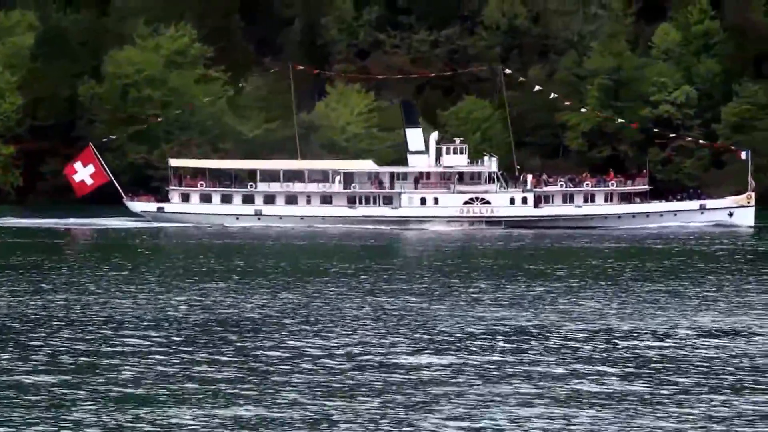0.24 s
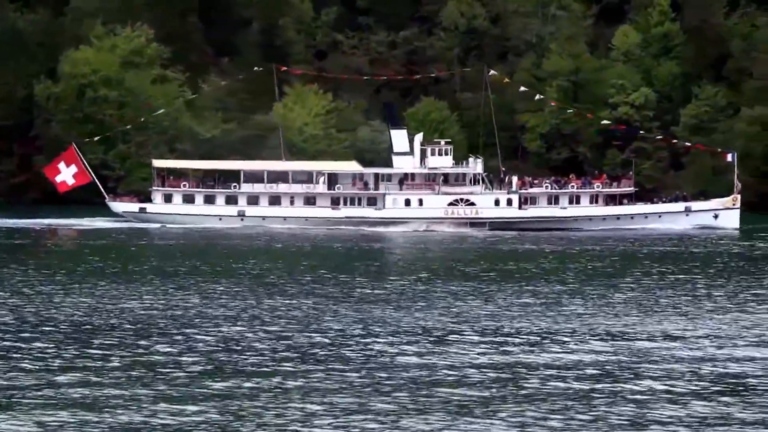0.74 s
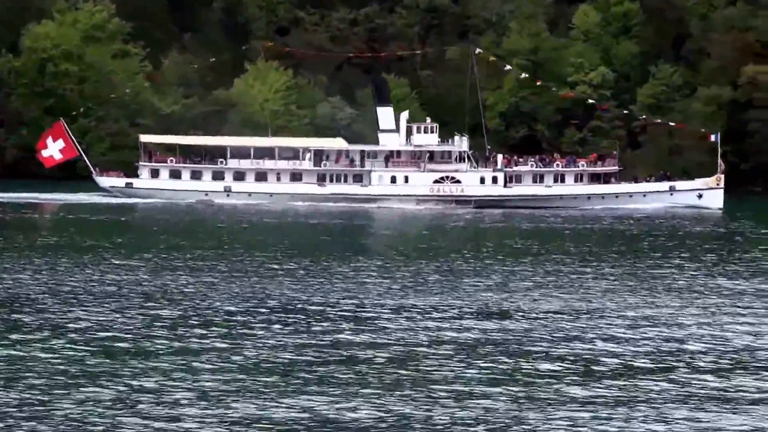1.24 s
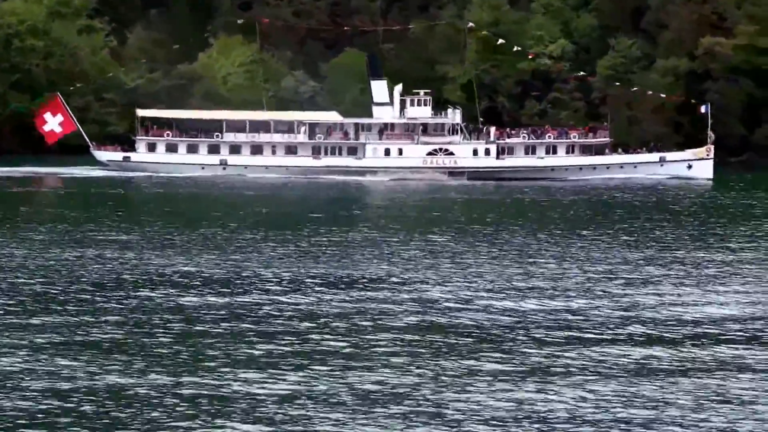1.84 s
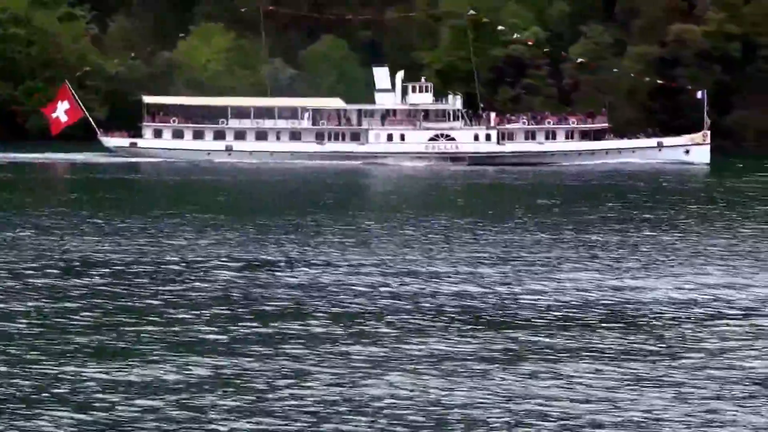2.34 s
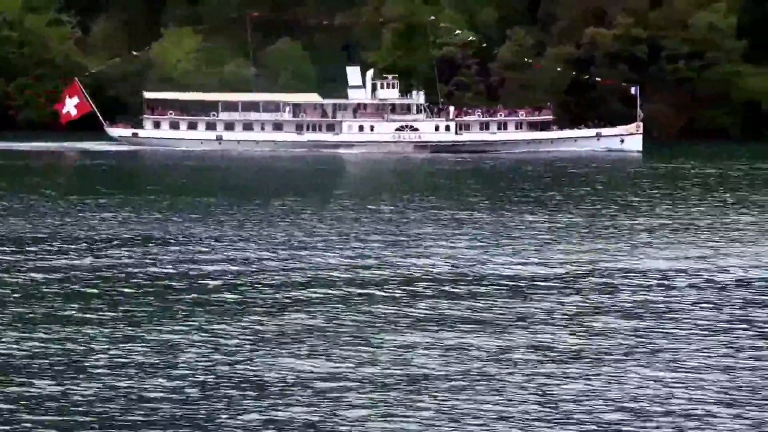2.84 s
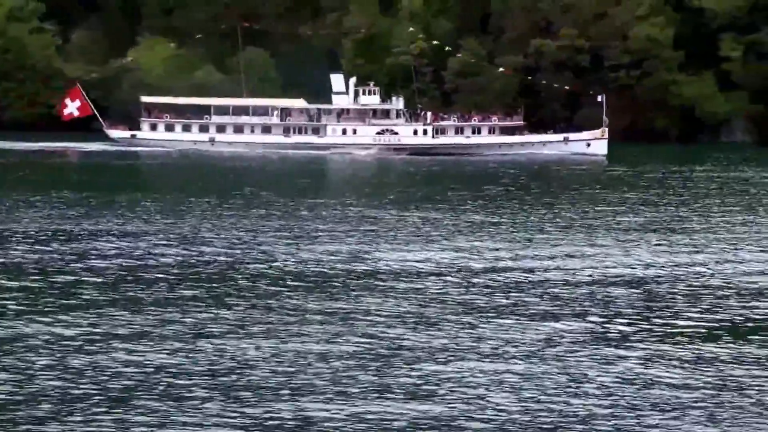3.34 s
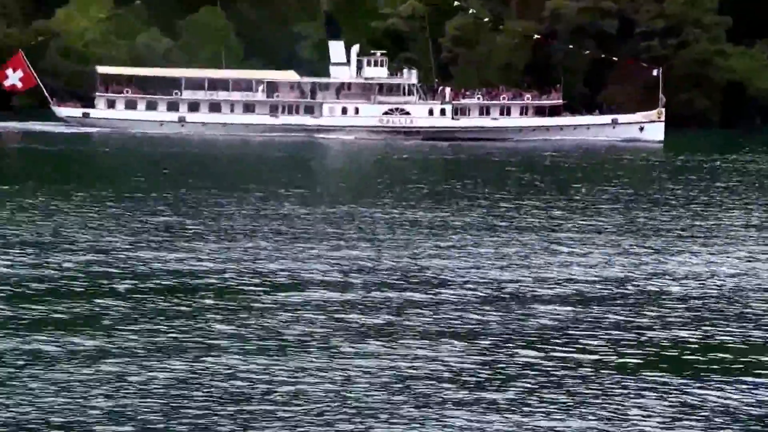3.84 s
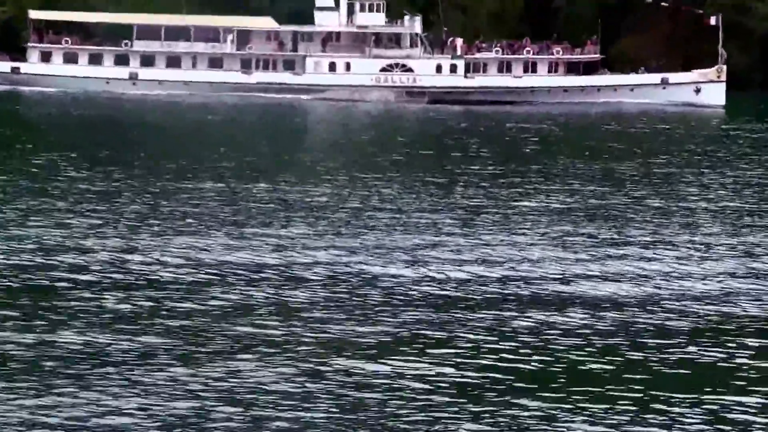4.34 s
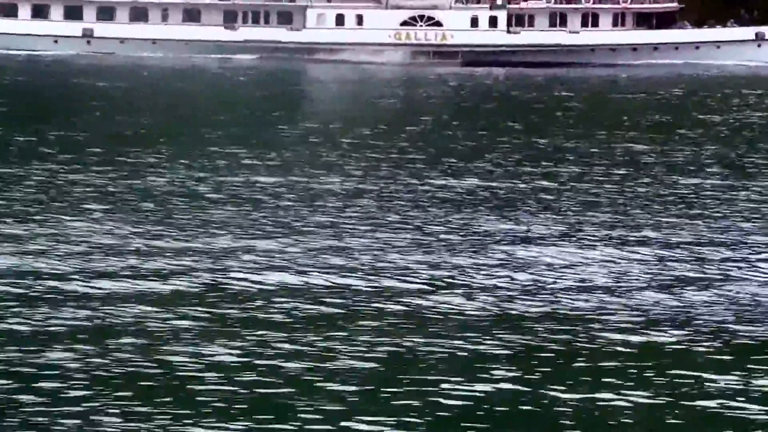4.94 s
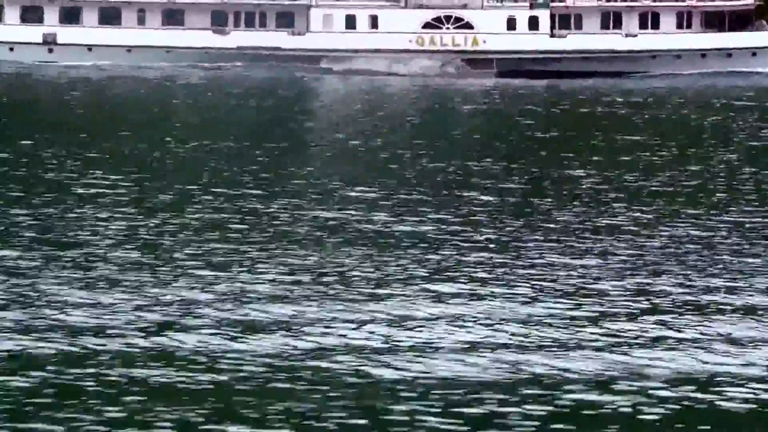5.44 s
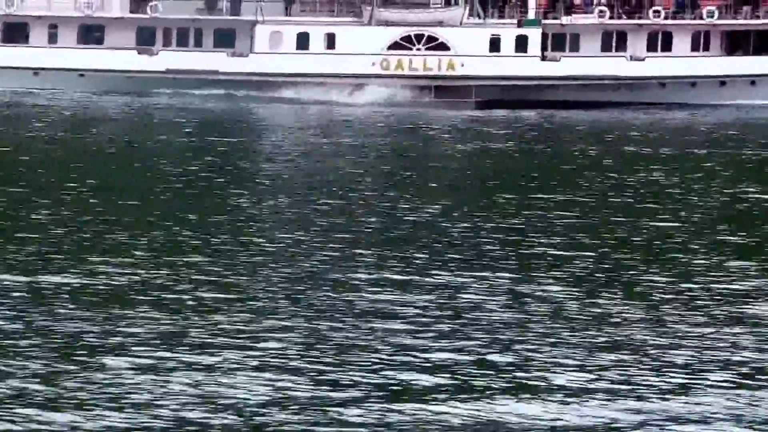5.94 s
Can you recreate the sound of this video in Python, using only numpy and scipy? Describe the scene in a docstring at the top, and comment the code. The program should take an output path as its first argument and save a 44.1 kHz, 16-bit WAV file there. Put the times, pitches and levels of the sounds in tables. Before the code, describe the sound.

Steady, low-mid roar of churned water from a passing paddle wheel, bubbling and gulping, sprinkled with small wet claps and fine droplets.

```python
"""A paddle steamer passes on a lake, heard across the water from the shore.
Its floats slap in a quick even beat and beat air into the water: dense gulps of resonant air pockets blend
into a somewhat louder wash of noise, a dull steady rush. The thrown spray falls back as a dense crackle of
filtered clicks and ringing bubbles, with sharper claps made of a snap and a damped ring.
Below lies a low pounding of noise, above it a thin hiss with brief swells and tiny ticks."""
import sys
import numpy as np
from scipy import signal
from scipy.fft import rfft, irfft
from scipy.io import wavfile

SR = 44100
rng = np.random.default_rng(int(sys.argv[2]) if len(sys.argv) > 2 else 0)


def put_to_file(sound):
    """Save the sound as 16-bit audio at rate SR, in the file named by the first command-line argument."""
    columns = np.atleast_2d(sound).T  # one column per channel
    safe = np.clip(columns, -1, 1)
    whole_steps = np.round(safe * 32767)
    wavfile.write(sys.argv[1], SR, whole_steps.astype(np.int16))


N = 272979

FLOAT_HZ, FIRST_SLAP_S = 4.62, .065   # mean strike rate; nominal time of the first slap


def float_beat(wander):
    """Periodic forcing: a cosine between -1 and 1 peaks at each float strike, its phase drifting by wander turns."""
    turns = FLOAT_HZ * (np.arange(N) / SR - FIRST_SLAP_S) + wander * drift(0.73)
    return np.cos(2 * np.pi * turns)


# Spectrum of the wash behind the wheel. Each row: frequency in Hz, relative density in dB per Hz.
WASH_SPECTRUM = [(100, -29), (220, -3), (380, 1.5), (750, -9.5), (1200, -20), (2000, -38.5), (4000, -63.5),
                 (12000, -95)]


def churn(churn_db, beat, gulp_db, wash_db, beat_db):
    """Superposition of bubble sources: dense gulps blend into the somewhat louder blurred wash of the wake."""
    pockets = widen(gulps(per_s=2200, spread_db=0.7, damping=0.12))
    water = from_db(gulp_db) * pockets + from_db(wash_db) * rush(WASH_SPECTRUM)
    return from_db(churn_db + beat_db * beat) * water


# Spectrum that weights the air pockets. Each row: frequency in Hz, relative gain in dB.
GULP_SPECTRUM = [(90, -28.5), (140, -11.5), (210, 3.5), (370, 6), (560, 2.5), (850, -4), (1300, -39.5)]


def gulps(per_s, spread_db, damping, count=22):
    """Damped bubble resonance: trapped air pockets of many sizes ring for a few cycles each."""
    return colour(sum(ringing(per_s, spread_db, damping, np.geomspace(110, 1200, count))), GULP_SPECTRUM)


# Spectrum of the low pounding. Each row: frequency in Hz, relative density in dB per Hz.
RUMBLE_SPECTRUM = [(20, -49), (40, -32.5), (60, -22), (80, -10), (100, -6), (160, 2), (220, 1),
                   (400, -19.5), (2000, -79.5)]


def rumble(level_db, beat, beat_db):
    """Cavity collapse: the largest cavities, left where a float dips in, collapse with a low pounding."""
    return from_db(level_db + beat_db * beat) * rush(RUMBLE_SPECTRUM)


# Spectrum of the falling drops. Each row: frequency in Hz, relative gain in dB.
SPRAY_SPECTRUM = [(80, -35), (250, -18), (600, 15), (1100, 9), (2000, -7), (3300, -23.5), (4100, -38),
                  (6300, -41.5), (8300, -60.5), (11000, -53.5), (13000, -75.5)]
# Spectrum of the finest drops. Each row: frequency in Hz, relative gain in dB.
FIZZ_SPECTRUM = [(1500, -14), (3300, 4), (4200, 1), (5000, -1), (6600, -7), (8000, -14), (11000, -15),
                 (12500, -30)]


def spray(spray_db, fizz_db, beat, beat_db, clump_db, bubble_db):
    """Random impacts: thrown water lands in clumps of tiny smacks that pinch off bubbles; the finest drops fizz."""
    smacks = rms_one(grains(per_s=3600, spread_db=5.0))
    mist = rms_one(grains(per_s=3500, spread_db=4.5))
    drops = from_db(spray_db + 8.0) * widen(colour(smacks, SPRAY_SPECTRUM))
    bubbles = from_db(spray_db + bubble_db) * widen(plips(per_s=1000, spread_db=2.5, damping=0.16))
    fine = from_db(fizz_db) * widen(colour(smacks + mist, FIZZ_SPECTRUM))
    landing = from_db(beat_db * beat + clump_db * drift(46))
    return landing * (drops + bubbles + fine)


BUBBLE_CUT_HZ = 3600   # low-pass on spray bubbles and clap pockets


def plips(per_s, spread_db, damping, count=12):
    """Bubble resonance: bubbles pinched off by spray ring briefly, the smallest faintest; distance softens onsets."""
    pitches = np.geomspace(1100, 3400, count)
    rings = ringing(per_s, spread_db, damping, pitches)
    weighted = sum(ring * (pitches[0] / hz) ** 2.4 for ring, hz in zip(rings, pitches))
    return rms_one(lowpass(weighted, 4, BUBBLE_CUT_HZ))


CLAP_LEFT_DB, CLAP_SCATTER_DB = 2, 2   # where the claps land, left minus right: mean and spread
# Sheets of water that clap down and trap a pocket of air. Each row: start in seconds, pocket resonance in Hz,
# ring level in dB, snap level in dB, both levels before the offsets shared by all claps.
CLAPS_HEARD = [(0.0824, 3600, -53, -56), (0.099, 2900, -39, -52), (0.1164, 2300, -38, -54),
               (0.1241, 2800, -43, -61), (0.2517, 3300, -50, -50), (0.4307, 2600, -39, -56),
               (0.947, 2100, -41, -50.5), (1.0212, 2800, -47, -64), (1.122, 2400, -45, -57),
               (1.2207, 2620, -46, -59), (1.248, 3500, -44, -48), (1.3607, 1950, -30.5, -62),
               (1.4064, 1750, -35, -56), (1.437, 2900, -37, -50), (1.47, 3000, -39.5, -58),
               (1.484, 2900, -44, -64), (1.543, 2000, -38, -50), (1.547, 3400, -47, -55),
               (1.5497, 3200, -47, -57), (1.589, 3100, -45, -61), (1.7697, 2100, -37, -62),
               (1.811, 1800, -30, -53), (1.917, 2100, -41, -50), (2.039, 3220, -45, -60),
               (2.164, 2500, -42, -57), (2.204, 3200, -40, -49), (2.2358, 2410, -40, -53),
               (2.32, 2330, -39, -59), (2.395, 2000, -32.5, -60), (2.409, 2930, -41, -65),
               (2.4131, 3000, -51, -63), (2.4747, 2700, -44, -62), (2.482, 2000, -36, -57),
               (2.4865, 3400, -48, -49), (2.5704, 3000, -44, -57), (2.5974, 3050, -38.5, -55),
               (2.6212, 2400, -42, -60), (2.6619, 2800, -49, -62), (2.7011, 2300, -42, -62),
               (2.807, 3400, -52, -58.5), (2.8458, 2700, -43.5, -64), (2.8511, 2950, -48, -63),
               (2.8673, 2100, -39, -59), (3.082, 2400, -41, -61), (3.1098, 2400, -40, -61),
               (3.1646, 2800, -54, -61), (3.2675, 2450, -41, -64), (3.3273, 2700, -42, -65),
               (3.3324, 3100, -49, -58), (3.508, 2900, -51, -61), (3.737, 2270, -40.5, -64),
               (3.93, 2050, -39, -63), (3.944, 2000, -33.5, -51), (4.0202, 3000, -52, -55),
               (4.2554, 3200, -53, -53), (4.3445, 2300, -40, -61), (4.481, 2200, -36.5, -56),
               (4.5623, 3000, -47, -54), (4.604, 2400, -41.5, -60), (4.733, 1980, -38, -61),
               (4.7956, 2450, -38.5, -54.5), (4.942, 2400, -43, -56), (5.0223, 2800, -45, -62),
               (5.0525, 1820, -37, -61), (5.114, 2260, -40.5, -56), (5.3149, 2400, -45, -59),
               (5.622, 2500, -43, -61), (5.628, 2400, -42.5, -62), (5.6648, 2250, -39, -52),
               (5.702, 1800, -37, -61), (5.7139, 1850, -38, -62), (5.774, 3200, -44, -52),
               (5.777, 2500, -35, -46), (6.0644, 2150, -37.5, -53), (6.1427, 1750, -32, -51),
               (6.1512, 3420, -57, -56)]
# Spectrum of the snap. Each row: frequency in Hz, relative gain in dB.
SNAP_SPECTRUM = [(1500, -2), (2700, 0), (3500, 0), (4300, -6), (5200, -10), (6500, -18), (8500, -24),
                 (11000, -27), (13000, -42)]


def claps(ring_db, snap_db, patter_s, snap_s):
    """Impulse excitation: each clap is a short snap with the heavily damped ring of its trapped air pocket."""
    out = np.zeros((2, N))
    for s, pocket_hz, low_db, high_db in np.vstack([CLAPS_HEARD, spatter()]):
        pocket = resonate(smack(patter_s), pocket_hz, width_hz=pocket_hz)
        pocket = lowpass(pocket, 4, pocket_hz)   # the ring dies off above its own pitch
        pocket = lowpass(pocket, 8, BUBBLE_CUT_HZ)
        snap = colour(smack(snap_s), SNAP_SPECTRUM, size=512)[:len(pocket)]
        sound = from_db(low_db + ring_db) * burst_one(pocket) + from_db(high_db + snap_db) * burst_one(snap)
        start = round(s * SR)
        left_db = CLAP_LEFT_DB + CLAP_SCATTER_DB * rng.standard_normal()
        out[:, start:start + len(sound)] += pan(sound, left_db)[:, :N - start]
    return out


# lesser claps: levels before the shared clap offsets
SPATTER_RING_DB, SPATTER_SNAP_DB, SPATTER_SPREAD_DB, SPATTER_FADE_DB_PER_S = -37.5, -57, 3, 1.5
SPATTER_LOW_HZ, SPATTER_OCTAVES, SPATTER_FALL_DB_PER_OCTAVE = 1700, 1.2, 12
SPATTER_RUN_S = 0.028   # the pieces of a torn sheet of water land within this time


def spatter(count=30, size=3):
    """Random arrivals: lesser claps come in short runs, small pockets ringing fainter; rows as in CLAPS_HEARD."""
    throws = np.repeat(rng.random(count), size) * (N / SR - 2 * SPATTER_RUN_S)
    delay, smallness, luck = rng.random((count * size, 3)).T
    s = throws + delay * SPATTER_RUN_S
    octaves = smallness * SPATTER_OCTAVES
    level_db = SPATTER_SPREAD_DB * (2 * luck - 1) - SPATTER_FADE_DB_PER_S * s
    ring_db = SPATTER_RING_DB - SPATTER_FALL_DB_PER_OCTAVE * octaves
    pocket_hz = SPATTER_LOW_HZ * 2 ** octaves
    return np.column_stack([s, pocket_hz, ring_db + level_db, SPATTER_SNAP_DB + level_db])


def smack(patter_s, size=512):
    """Impact noise: water hits water in a patter that decays exponentially at once."""
    return rng.standard_normal(size) * np.exp(-np.arange(size) / SR / patter_s)


HISS_CUT_HZ = 11600   # low-pass on ticks and swells
# Faint high ticks close by. Each row: time in seconds, peak level in dB before a shared offset.
TICKS_HEARD = [(1.1238, -63), (2.9064, -62), (2.9805, -68), (3.0012, -52), (3.0945, -47), (3.4374, -64),
               (3.4404, -62)]
# Spectrum of the thin hiss. Each row: frequency in Hz, relative density in dB per Hz.
HISS_SPECTRUM = [(3000, -22), (6500, -8), (9000, -8), (10200, -1), (11200, 0), (12200, -20), (14000, -36)]


def high_hiss(hiss_db, tick_db, tick_s):
    """Filtered noise: a thin hiss far above the rush, with a few tiny ticks of the same colour."""
    level = np.zeros(N)
    for s, peak_db in TICKS_HEARD:
        age = np.arange(N) / SR - s
        level += from_db(peak_db + tick_db) * (age >= 0) * np.exp(-np.abs(age) / tick_s)
    ticks = lowpass(level * rush(HISS_SPECTRUM) + 1e-18, 12, HISS_CUT_HZ)
    return from_db(hiss_db) * rush(HISS_SPECTRUM) + ticks


# Brief swells of the high hiss. Each row: centre in seconds, peak level in dB before the low-pass,
# half-length in seconds (to 1/e), centre frequency in Hz, width of each of two resonances in Hz.
SWELLS_HEARD = [(0.231, -65.5, 0.027, 10600, 1300), (.57, -66, 0.041, 10700, 1910),
                (.57, -72, .035, 8200, 1500), (0.733, -69, 0.044, 10700, 1700), (.73, -75, .05, 7800, 504),
                (2.016, -71, .05, 6300, 1290), (2.03, -72.5, .07, 10700, 1500)]


def swells():
    """Amplitude modulation: narrow bands of hiss rise and fall smoothly, each around one moment."""
    out = np.zeros(N)
    for s, peak_db, half_s, hz, width_hz in SWELLS_HEARD:
        band = resonate(resonate(rng.standard_normal(N), hz, width_hz), hz, width_hz)
        envelope = np.exp(-((np.arange(N) / SR - s) / half_s) ** 2)
        out += from_db(peak_db) * envelope * rms_one(band)
    return lowpass(out, 8, HISS_CUT_HZ)


def rush(spectrum):
    """Central limit: water sounds so many that they blur into a smooth stereo noise."""
    return widen(colour(rng.standard_normal((2, N)), spectrum))


def grains(per_s, spread_db):
    """Poisson-like arrivals: random clicks, many small and few large, each from its own direction: (mid, side)."""
    sizes = from_db(spread_db * np.minimum(rng.exponential(1, N), 5))
    clicks = (rng.random(N) < per_s / SR) * sizes * rng.choice([-1, 1], N)
    return np.array([clicks, clicks * rng.uniform(-1, 1, N)])


def ringing(per_s, spread_db, damping, pitches):
    """Resonator bank: each random click excites one pitch; damping is bandwidth over pitch."""
    births = grains(per_s, spread_db)
    dealt = rng.integers(0, len(pitches), N)
    return (resonate(births * (dealt == k), hz, damping * hz) for k, hz in enumerate(pitches))


def resonate(x, hz, width_hz):
    """Second-order resonance: one peak with gain 1 at its top."""
    r = np.exp(-np.pi * width_hz / SR)
    feedback = [1, -2 * r * np.cos(2 * np.pi * hz / SR), r * r]
    return signal.lfilter(np.array([1, 0, -1]) * (1 - r * r) / 2, feedback, x + 1e-18)


def lowpass(x, order, hz):
    """Butterworth filtering: a smooth pass band falls off above hz."""
    return signal.sosfilt(signal.butter(order, hz, fs=SR, output="sos"), x)


def colour(x, spectrum, size=4096):
    """Minimum phase: folding the cepstrum gives a causal filter with the given spectrum."""
    cepstrum = irfft(np.log(from_db(at_hz(spectrum, np.arange(size // 2 + 1) * SR / size))))
    cepstrum[1:size // 2] *= 2
    cepstrum[size // 2 + 1:] = 0
    impulse = irfft(np.exp(rfft(cepstrum)))
    return np.apply_along_axis(signal.fftconvolve, -1, x, impulse)[..., :N]


# Stereo width of the rush. Each row: frequency in Hz, side over mid in dB.
STEREO_WIDTH = [(25, -13), (60, -21), (140, -12.5), (300, -8.5), (550, -5), (1000, -2.5), (2000, -4),
                (4000, -8), (10000, -10.5)]


def widen(sound):
    """Sum and difference: mid and side become left and right, widest in the middle of the range."""
    mid, side = sound
    return rms_one(mid) + colour(rms_one(side), STEREO_WIDTH) * np.array([[1], [-1]])


def pan(x, left_db):
    """Level difference: place a sound between left and right."""
    return x * from_db(np.array([[.5], [-.5]]) * left_db)


def drift(rate):
    """Low-passed noise: a smooth random curve of spread 1 that turns about rate times a second."""
    r = np.exp(-80 * np.pi * rate / SR)   # computed at every 40th sample
    slow = signal.lfilter([1], [1, -2 * r, r * r], rng.standard_normal(N // 40 + 2002))[2000:]
    return np.interp(np.arange(N) / 40, np.arange(len(slow)), rms_one(slow))


def fading(start_db, db_per_s):
    """Exponential decay: a level in dB that sinks steadily as the ship draws on."""
    return start_db - db_per_s * np.arange(N) / SR


def in_time(rows):
    """Linear interpolation: the columns of a curve table at every sample."""
    s, *columns = np.transpose(rows)
    return [np.interp(np.arange(N) / SR, s, c) for c in columns]


def at_hz(points, hz):
    """Logarithmic pitch: read a spectrum on a log-frequency axis."""
    known_hz, values = np.transpose(points)
    return np.interp(np.log(np.maximum(hz, 1)), np.log(known_hz), values)


def from_db(db):
    """Logarithmic level: decibels to amplitude gain."""
    return 10 ** (np.asarray(db) / 20)


def rms_one(x):
    """Mean power: scale to unit power."""
    return x / np.sqrt(np.mean(x ** 2) + 1e-20)


def burst_one(x):
    """Burst energy: scale a short sound to unit power over three milliseconds."""
    return x * np.sqrt(.003 * SR) / np.linalg.norm(x)


# How hard the wheel works the water. Each row: time in seconds, churn level in dB, spray level in dB,
# rumble level in dB, all before the beat and the mix gains.
WHEEL_EFFORT = [(0.0, -18.5, -36.5, -34), (0.13, -17, -35.5, -27), (0.3, -16.3, -38.5, -34.5),
                (0.52, -18.5, -36.5, -28), (0.75, -17, -38, -32), (1.0, -17.5, -36, -29.5),
                (1.25, -18, -38.5, -27), (1.62, -18.5, -40, -35.5), (1.8, -18, -38, -32.5),
                (2.0, -17, -37, -28.5), (2.26, -17.5, -40, -37), (2.42, -18.5, -38.5, -33),
                (2.58, -19.5, -41, -34), (2.95, -19.5, -41, -32.5), (3.27, -18.0, -39, -33),
                (3.52, -18.5, -38.5, -35), (3.66, -19.6, -39, -37.5), (3.8, -17.5, -38.5, -34),
                (3.93, -18, -39, -29.5), (4.1, -18, -40.5, -32.5), (4.35, -17.5, -39.5, -35.5),
                (4.62, -19.5, -41, -33.5), (4.8, -18.5, -39.5, -35.5), (5.05, -18.5, -38.5, -34.5),
                (5.33, -18, -40, -31), (5.5, -19.5, -39.5, -38), (5.75, -19, -37.5, -32),
                (5.97, -17.5, -42, -40), (6.19, -18, -41, -31.5)]
# The finest drops swing more widely than the rest of the spray (dB per dB).
FIZZ_DB, FIZZ_FADE_DB_PER_S, FIZZ_FOLLOWS = -66, 1.3, 1.6
# The thin hiss rises and fades with the spray too (dB per dB).
HISS_DB, HISS_FOLLOWS = -81.5, .7


def scene():
    """Common forcing: the float beat drives rumble, churn and spray; fizz and hiss follow the spray level."""
    churn_db, spray_db, rumble_db = in_time(WHEEL_EFFORT)
    swing_db = spray_db - spray_db.mean()
    fizz_db = fading(FIZZ_DB, FIZZ_FADE_DB_PER_S) + FIZZ_FOLLOWS * swing_db
    hiss_db = HISS_DB + HISS_FOLLOWS * swing_db
    beat = float_beat(wander=0.05)
    water = pan(churn(churn_db, beat, gulp_db=-5.0, wash_db=-2.5, beat_db=0.14), left_db=1.0)
    deep = rumble(rumble_db, beat, beat_db=-0.5)   # negative: strongest between the slaps
    splash = spray(spray_db, fizz_db, beat, beat_db=0.43, clump_db=1.78, bubble_db=-8.5)
    splash = pan(splash, left_db=-1.3)
    sharp = claps(ring_db=0.5, snap_db=2.5, patter_s=0.0011, snap_s=.0005)
    hiss = pan(high_hiss(hiss_db, tick_db=2.0, tick_s=0.0013) + swells(), left_db=-3.5)
    return water + deep + splash + sharp + hiss


CUTOFF_HZ = 15700


def record(dry):
    """Band limitation: the top is cut steeply."""
    return signal.sosfilt(signal.cheby2(12, 70, CUTOFF_HZ, fs=SR, output="sos"), dry)


dry = scene()
out = record(dry)
put_to_file(out)
```